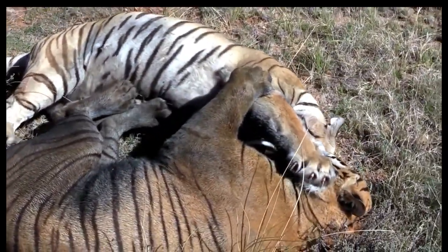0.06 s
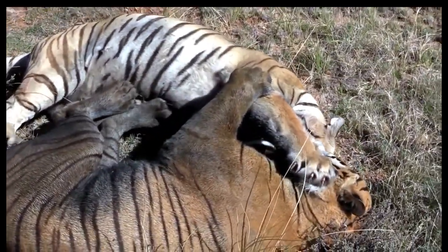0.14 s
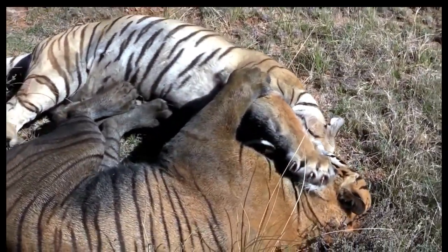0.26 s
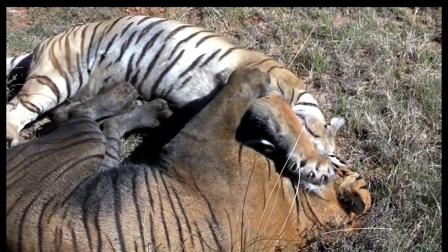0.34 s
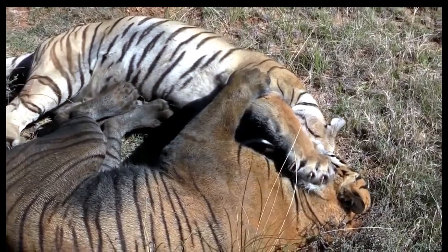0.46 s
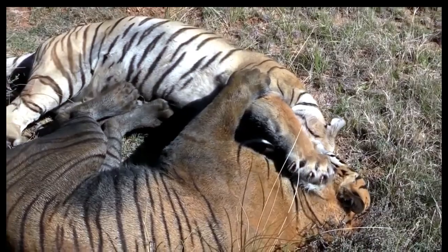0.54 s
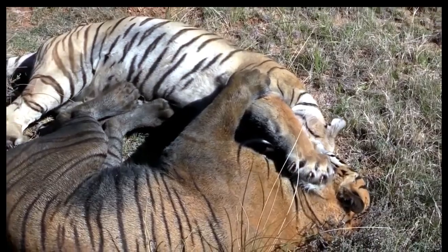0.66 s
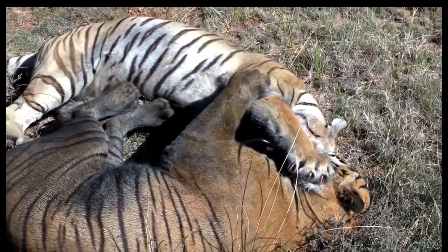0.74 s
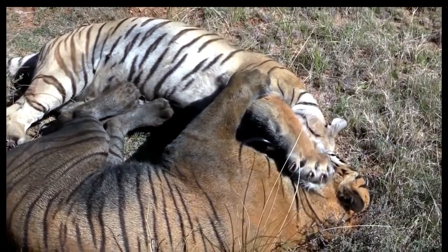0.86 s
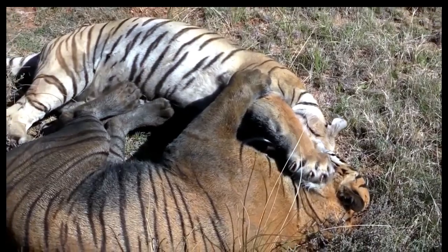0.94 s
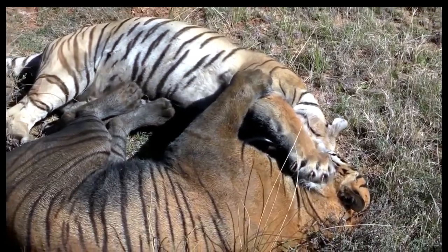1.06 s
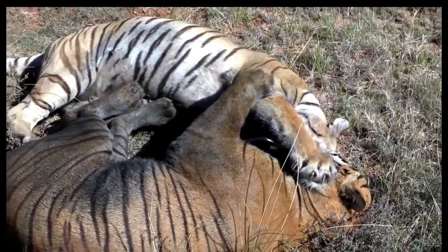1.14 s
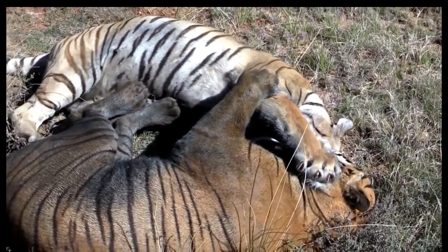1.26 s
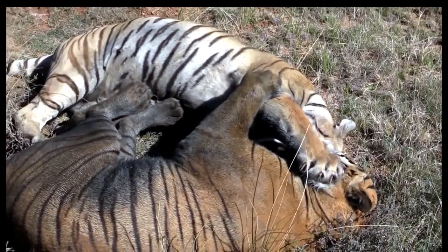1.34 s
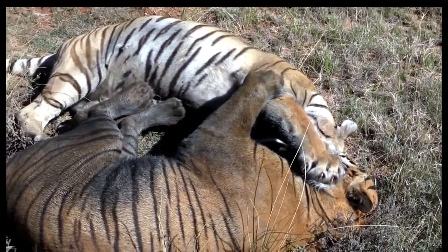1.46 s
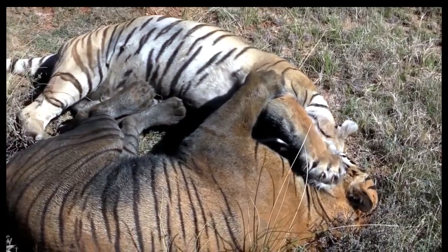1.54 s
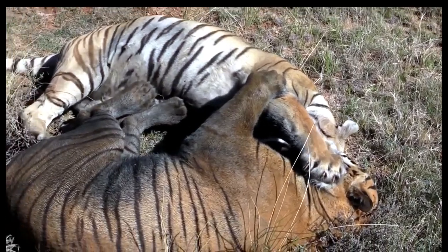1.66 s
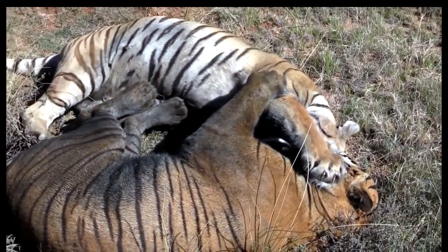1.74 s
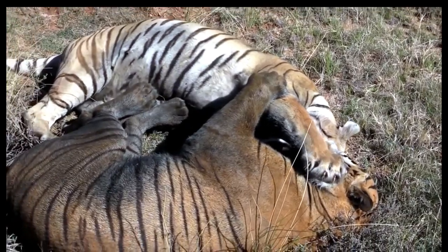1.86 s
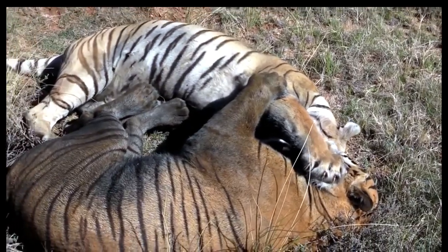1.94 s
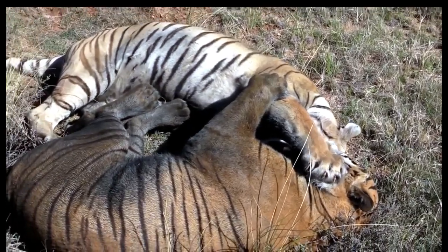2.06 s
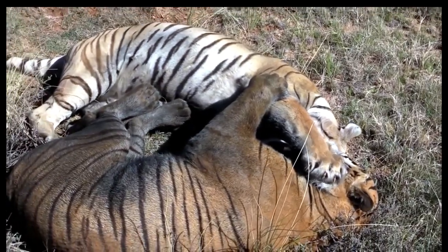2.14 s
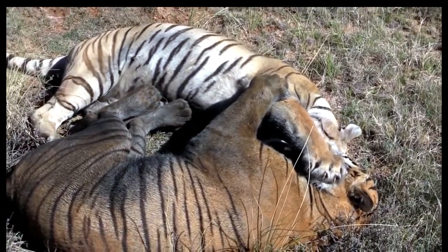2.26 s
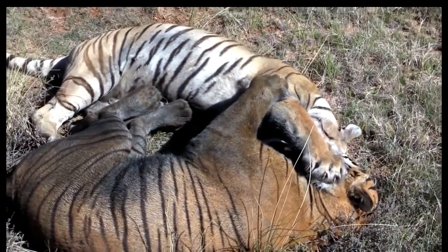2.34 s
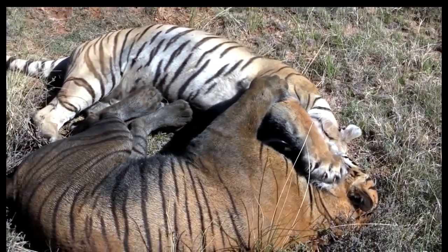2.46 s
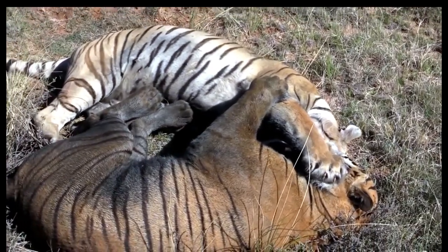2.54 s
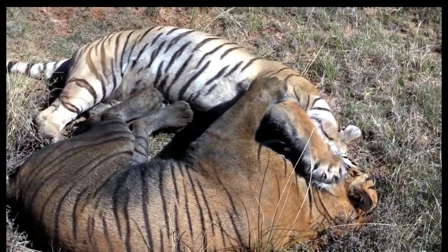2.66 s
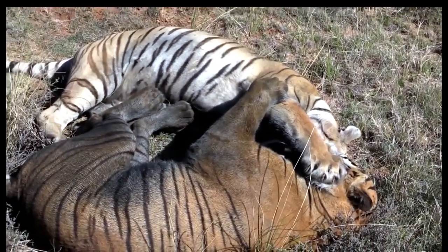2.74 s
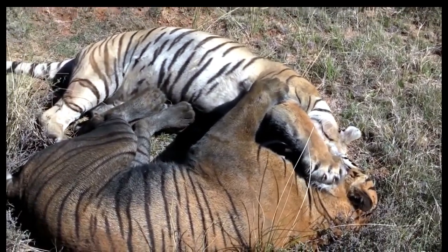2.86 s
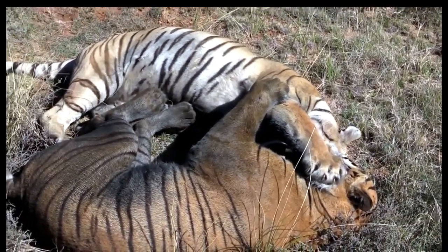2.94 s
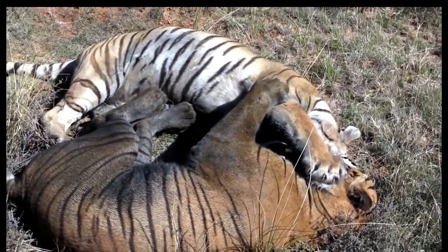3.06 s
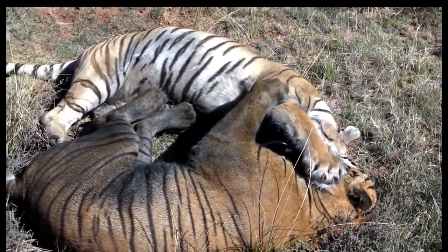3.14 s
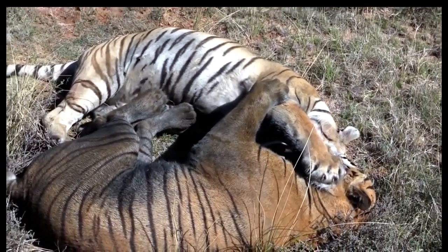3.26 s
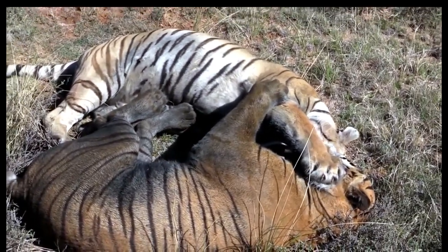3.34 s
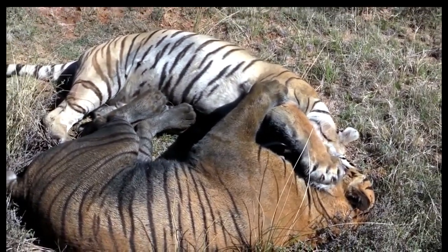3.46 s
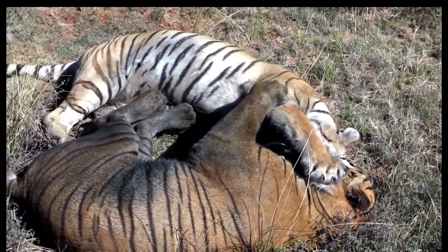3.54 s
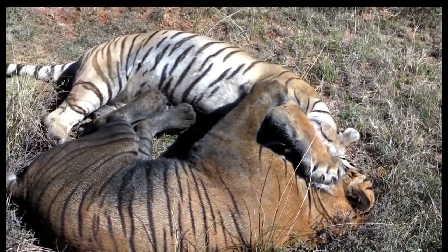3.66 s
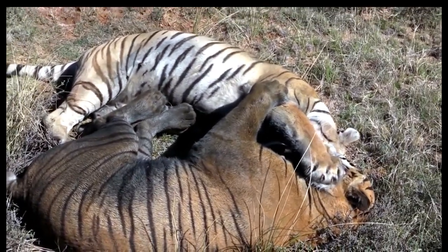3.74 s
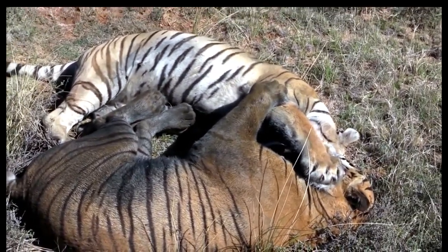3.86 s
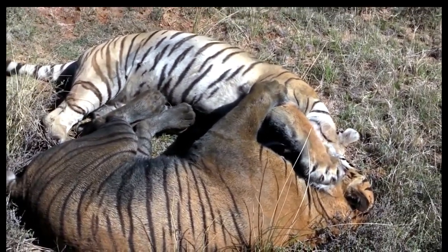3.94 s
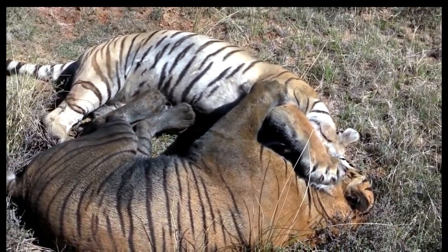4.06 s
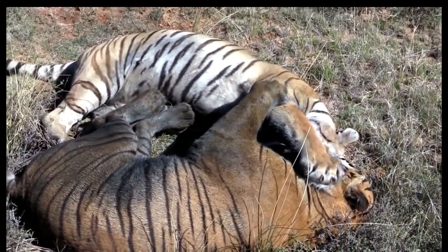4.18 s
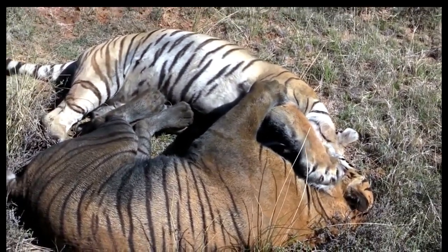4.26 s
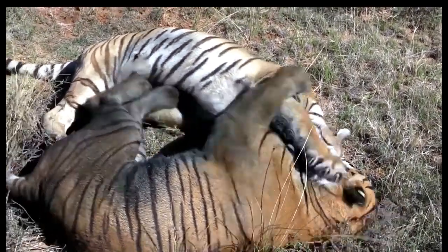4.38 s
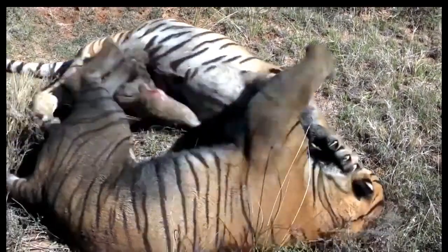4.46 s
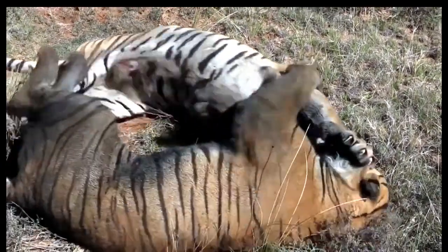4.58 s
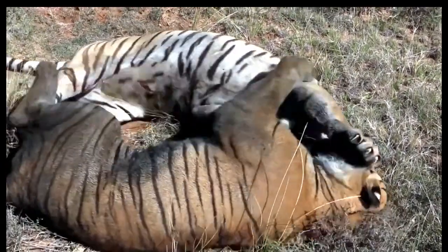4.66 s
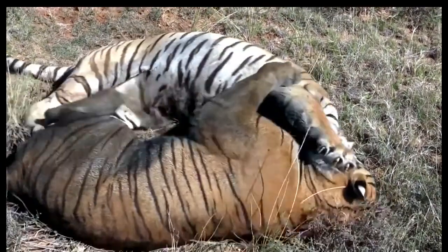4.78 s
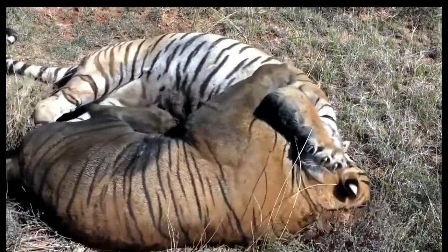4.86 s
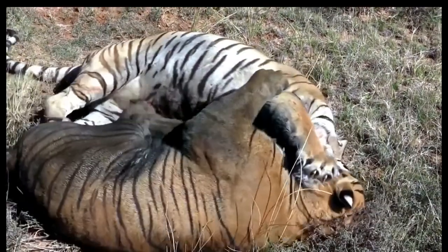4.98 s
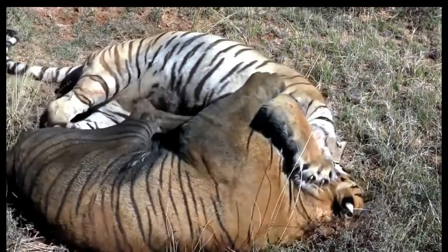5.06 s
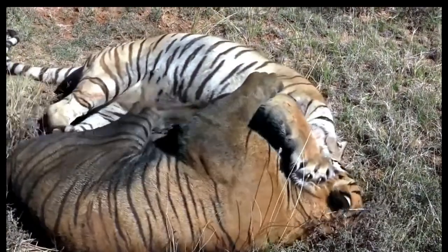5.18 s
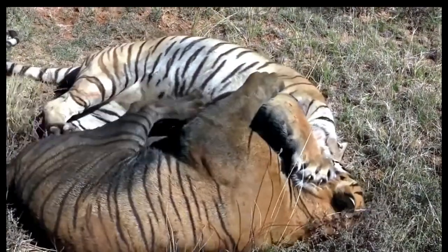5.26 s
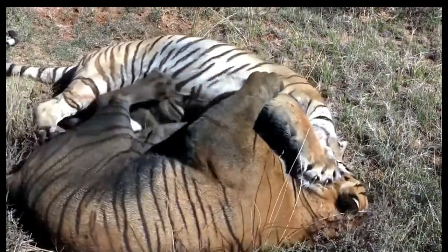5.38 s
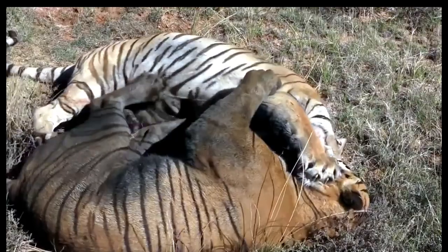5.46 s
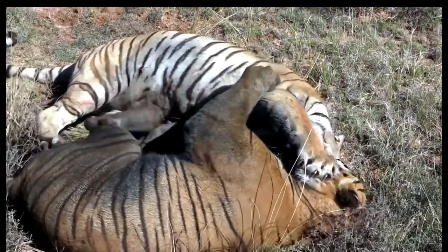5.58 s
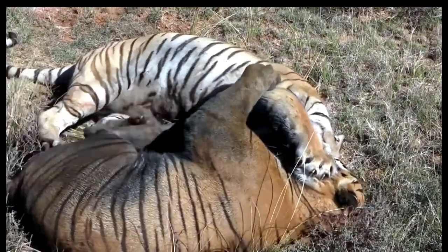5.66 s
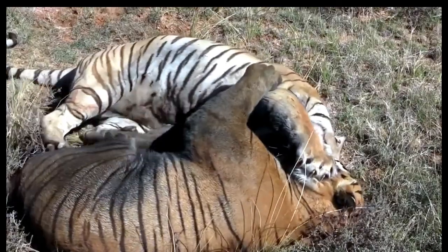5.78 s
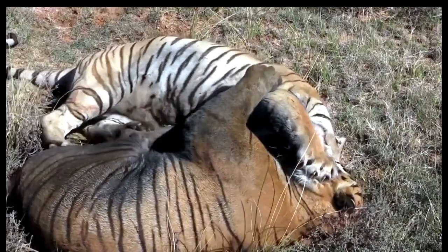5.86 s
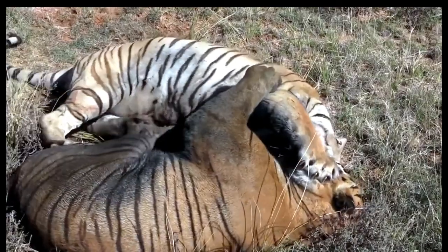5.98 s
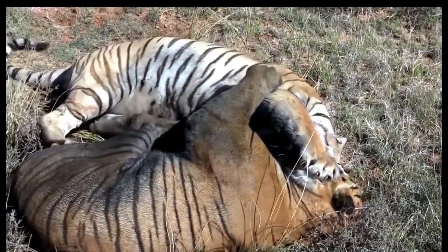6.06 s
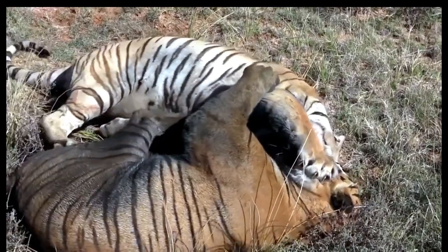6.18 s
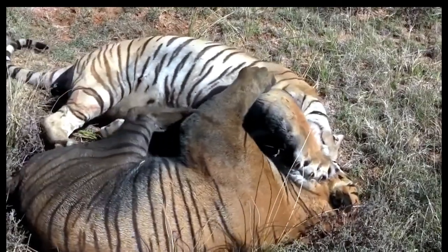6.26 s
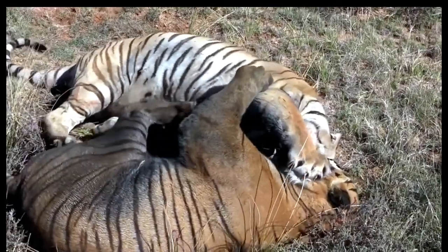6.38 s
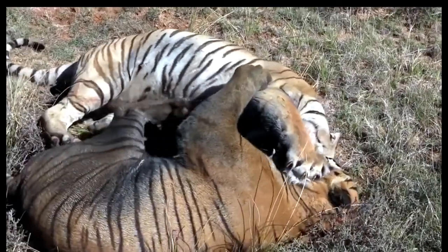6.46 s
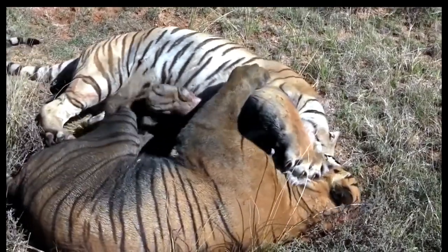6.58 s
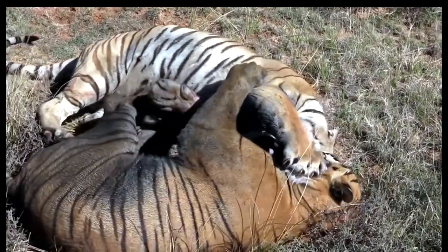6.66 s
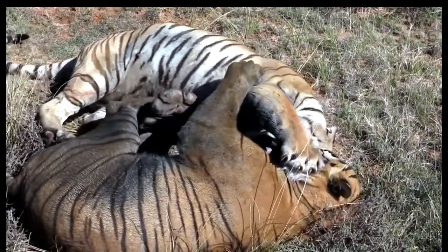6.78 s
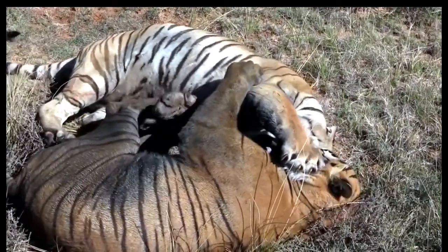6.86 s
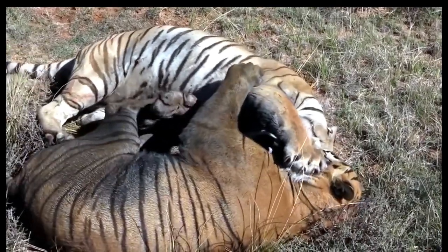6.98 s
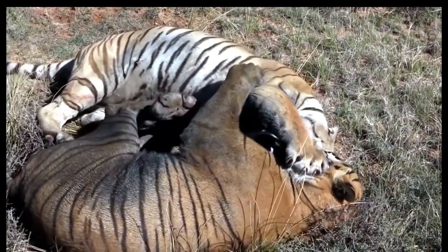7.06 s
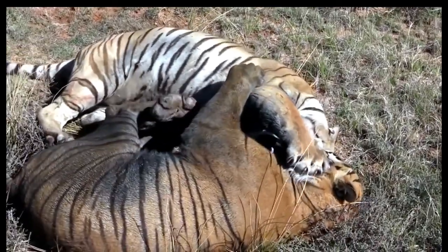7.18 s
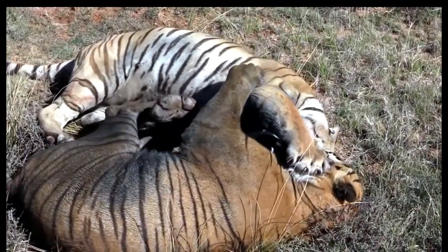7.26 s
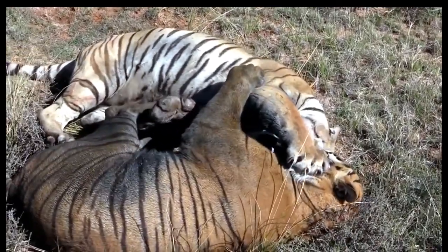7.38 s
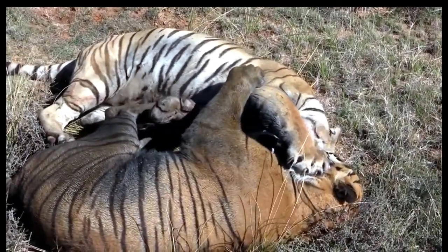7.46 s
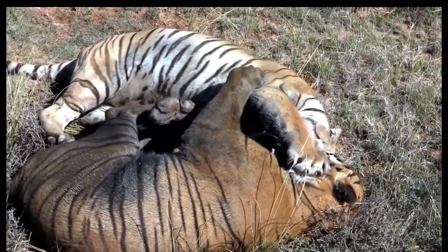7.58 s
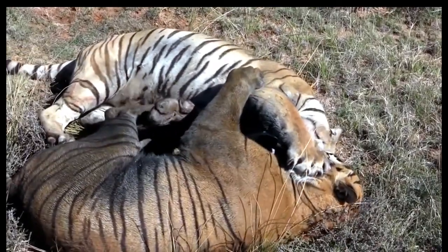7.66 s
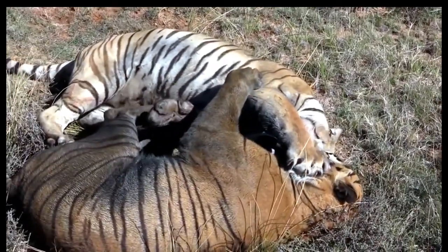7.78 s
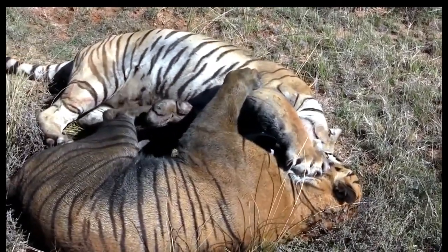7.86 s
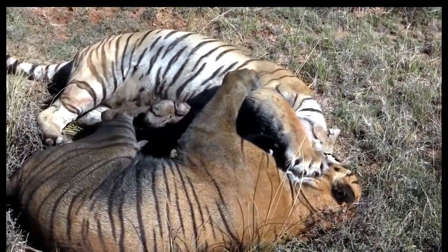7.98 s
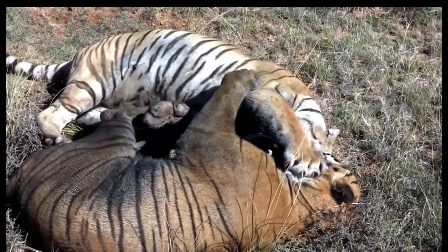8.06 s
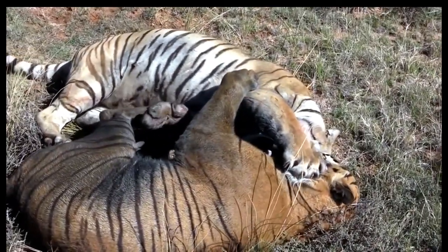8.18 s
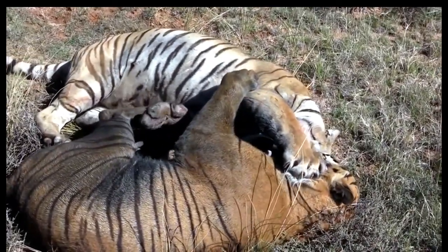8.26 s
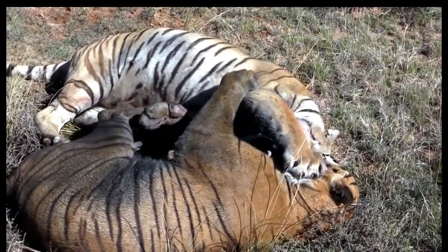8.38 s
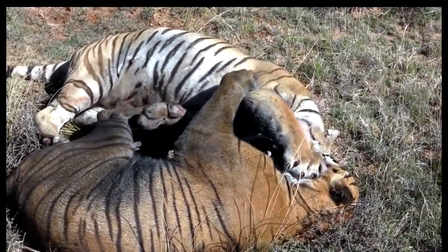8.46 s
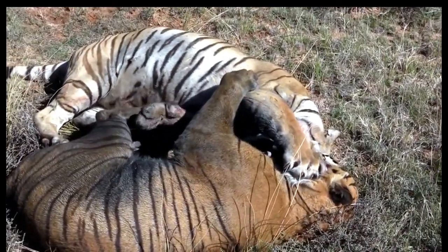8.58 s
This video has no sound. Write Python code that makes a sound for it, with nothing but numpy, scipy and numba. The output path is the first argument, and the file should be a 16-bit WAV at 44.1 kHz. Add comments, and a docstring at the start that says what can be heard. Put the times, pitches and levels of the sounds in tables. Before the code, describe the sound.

A tiger breathes in hoarse fluttering growls, bursts into a loud rasping roar amid a kick and snapping grass, then growls again over a quiet plain.

```python
"""Two tigers in dry grass

Two tigers lie locked together a few metres away. One breathes in hoarse fluttering growls and
breaks into a roar: pulses and turbulent air drive resonances of throat, mouth and chest. The other
rumbles deep in its chest. A kick thrashes the grass in crackling noise, stalks snap as short filtered
bursts, and small birds chirp far off as gliding tones over the hush of the plain, a shaped noise."""
import sys
import numpy as np
from scipy import signal
from scipy.fft import rfft, irfft, next_fast_len
from scipy.io import wavfile
from scipy.ndimage import uniform_filter1d
from numba import njit

SR = 44100
rng = np.random.default_rng(int(sys.argv[2]) if len(sys.argv) > 2 else 0)


def inscribe(sig):
    """Save sig as 16-bit PCM at rate SR to the path in sys.argv[1].

    A 1-D sig is mono; a 2-D sig holds one channel per row.
    Samples are clipped to [-1, 1] before scaling.
    """
    pcm = np.round(np.clip(np.atleast_2d(sig).T, -1, 1) * 32767)
    wavfile.write(sys.argv[1], SR, pcm.astype(np.int16))


N = 380583
T = np.arange(N) / SR

# Spectrum of turbulent air, breathed or roared: (frequency [Hz], relative level [dB])
AIR_SPECTRUM = [(2500, 12), (4000, 1.5), (5500, -5.5), (6500, -3), (8000, -4.5), (10000, -13), (13000, -15),
                (15500, -29.5)]

# Course of the roar: (time [s], mouth level [dB], upper throat level [dB], mouth resonance [Hz],
# pharynx against mouth [dB], hiss against upper throat [dB])
ROAR_COURSE = [(4.6, -46, -56, 412, -11, 0), (4.63, -32.5, -50, 407, 9, 14),
               (4.68, -17, -38.5, 383, -37, 7), (4.735, -8.5, -16.5, 465, -9.5, -10.5),
               (4.79, -17, -36, 495, -16.5, 7), (4.83, -15, -30.5, 415, -19, 1.5),
               (4.87, -12, -29.5, 437, -3, -1.5), (4.96, -17, -25.5, 438, 1, -4),
               (5.06, -17, -26, 457, -0.5, -5), (5.165, -15, -15, 460, 0.5, -13.5),
               (5.22, -25, -37.5, 457, 8.5, 4), (5.28, -19, -24.5, 485, -11, -10.5),
               (5.37, -20, -28.5, 423, 1, 3.5), (5.44, -30, -32.5, 483, 3.5, 2.5),
               (5.49, -17.5, -26.5, 427, -14, -4.5), (5.59, -22.5, -24.5, 426, -0.5, -2),
               (5.675, -25.5, -24.5, 428.2, 0.5, -7), (5.745, -25.5, -24.5, 440, -3, -3),
               (5.97, -42, -35, 448.3, -2, 0), (6.02, -65, -54, 410.6, 1, 3)]
# Resonances of the upper throat, each wandering a little around its centre:
# (centre [Hz], width of the sharper stage [Hz], relative level [dB])
ROAR_RESONANCES = [(722, 600, -10), (958, 127, 15.5), (1147, 70, 11.5), (1345, 750, 5), (1880, 79, -20),
                   (2145, 220, 10.5), (2300, 49, -23.5), (2430, 1100, -18), (3105, 390, -5),
                   (3790, 142, 1.5)]
# Heavy folds closing: (time [s], snaps counted so far)
FOLD_COUNT = [(4.6, -2), (4.634, 0), (4.699, 4), (4.764, 8), (4.843, 13), (4.903, 17), (4.995, 23),
              (5.036, 26), (5.11, 31), (5.155, 34), (5.239, 39), (5.276, 41), (5.326, 44), (5.463, 52),
              (5.588, 59), (5.663, 63), (5.722, 66), (5.787, 69), (5.86, 72), (5.914, 74), (5.976, 76),
              (6.004, 77), (6.04, 78.2)]
# Single hard cracks among the snaps: (time [s], level above the other snaps [dB])
HARD_CRACKS = [(4.764, 4), (4.872, 2.5), (5.036, 4), (5.082, 2.5), (5.11, 3), (5.127, 3), (5.155, 3),
               (5.276, 2), (5.326, 3), (5.722, 5)]
# Chest in the roar, at onset, peak and end: (time [s], level [dB])
ROAR_CHEST_SWELL = [
    [(4.6, -38), (5.16, -30.5), (5.99, -44)],
]
# The jaw shapes the mouth: (time [s], pharynx [Hz], front of the mouth [Hz], front against mouth [dB],
# damping of the mouth [0-1])
JAW_COURSE = [(4.6, 310, 605, -10.5, 0.2), (4.69, 337, 600, -10.5, 0), (4.76, 338, 627, -1.5, 0.5),
              (4.84, 334, 616, -3.5, 0), (4.93, 327, 610, -2, 0.2), (5.03, 294, 600, -5.5, 1),
              (5.18, 292, 640, -3.5, 1), (5.28, 300, 695, 3.5, 1), (5.34, 325, 613, -0.5, 0.9),
              (5.44, 310, 746, -3, 1), (5.52, 330, 644, -4, 0.44), (5.6, 333, 650, -7, 0.27),
              (5.7, 313, 706, -2, .9), (6.04, 303, 760, 5, 1)]
# The tongue shifts a bright resonance: (time [s], centre [Hz], level against the upper throat [dB])
TONGUE_COURSE = [(4.6, 1490, 16), (4.76, 1550, 20), (4.84, 1860, 6), (5.15, 1970, -11.5), (5.22, 1240, -3),
                 (5.33, 1190, -25.5), (5.38, 1900, -15), (5.5, 2210, 2), (5.6, 2250, -2.5),
                 (5.79, 2190, 12.5), (5.82, 2303, -14), (5.84, 3000, -2), (5.87, 3120, 0), (6.04, 2960, -5)]
ROAR_CHEST_SAG = 0.037
# Air against the snaps at a firm upper throat level, before the boosts of low and high drive
AIR_DB, AIR_PER_DB, FIRM_DB = -8, .7, -24
TIGHT_WIDTH_HZ, SLACK_WIDTH_HZ, FRONT_WIDTH_HZ, PHARYNX_WIDTH_HZ = 75, 190, 210, 170.
CLICK_DB = -7  # the snap itself, heard past the ringing
THROAT_DRIFT = .02  # share by which each upper resonance wanders


def roar():
    """Source-filter principle: snapping folds, loose flaps and rasping air ring mouth, throat and chest."""
    gate, mouth_db, upper_db, mouth_hz, pharynx_db, hiss_db = play([ROAR_COURSE])
    _, chest_db = swell(ROAR_CHEST_SWELL, ROAR_CHEST_SAG)
    _, pharynx_hz, front_hz, front_db, damping = play([JAW_COURSE])
    _, tongue_hz, tongue_db = play([TONGUE_COURSE])

    pulses, phase, size = counted(FOLD_COUNT, .025, 1.5, HARD_CRACKS)
    flaps = folds(135. * (gate > 0), .35, 4.0)
    snaps = even(pulses)
    rasp = even(size * (.5 + np.exp(-phase / 0.1)) * air())
    loose = even(rasp - 1.12 * even(flaps))
    # slacker folds leak more air
    leak_db = np.minimum(AIR_DB + AIR_PER_DB * (FIRM_DB - upper_db), 3)
    low = snaps + undb(leak_db + 2.5) * loose
    # turbulence weighs more in the treble
    high = uniform_filter1d(snaps, size=7) + undb(leak_db + 9) * loose

    tight = even(svf(svf(low, mouth_hz, 3 * TIGHT_WIDTH_HZ), mouth_hz, TIGHT_WIDTH_HZ))
    slack = even(svf(svf(low, mouth_hz, 3 * SLACK_WIDTH_HZ), mouth_hz, SLACK_WIDTH_HZ))
    pharynx = even(svf(svf(low, pharynx_hz, PHARYNX_WIDTH_HZ), pharynx_hz, PHARYNX_WIDTH_HZ))
    front = even(svf(svf(low, front_hz, 3 * FRONT_WIDTH_HZ), front_hz, FRONT_WIDTH_HZ))
    click = even(throat(uniform_filter1d(snaps, size=12), [(800, 1800, 0)]))
    damping = damping.clip(0, 1)
    mouth = (1 - damping) * tight + damping * slack + undb(pharynx_db) * pharynx
    mouth = even(mouth - undb(front_db) * front - undb(CLICK_DB) * click)

    upper = undb(tongue_db) * svf(svf(high, tongue_hz, 650.), tongue_hz, 650.)
    for k, (mode_hz, width, db) in enumerate(ROAR_RESONANCES):
        hz = mode_hz * np.exp(THROAT_DRIFT * walk(11))
        upper = upper + (-1) ** k * undb(db) * svf(svf(high, hz, 3. * width), hz, 1. * width)
    upper = even(upper)
    hiss = even(colour(.1 * snaps + rasp, AIR_SPECTRUM))
    chest = even(throat(low, [(109, 39.0, 0.0), (158.0, 48, -1.5)], steep=True))
    throat_sound = undb(upper_db) * (upper + undb(hiss_db) * hiss)
    return gate * (undb(mouth_db) * mouth + throat_sound + undb(chest_db) * chest)


# Growled breaths out, each at onset, peak and end:
# (time [s], throat level [dB], hiss against throat [dB], depth of the flutter [0-1])
BREATHS_OUT = [
    [(0.08, -47, -2, 0), (0.212, -33.5, -2.5, 0.42), (0.75, -50.5, -2, 0.56)],
    [(1.78, -52, 3.5, 0.04), (2.13, -42.5, -6.5, 0.55), (2.45, -53.5, -3, 0.57)],
    [(3.315, -44.5, -10, .2), (3.66, -47, -7, .78), (3.83, -63, -9, .84)],
    [(5.975, -31.5, -14, 0.62), (6.012, -26, -18, 0.5), (6.03, -51, -18, 0.7)],
    [(6.86, -43, -3, 0.24), (7.274, -28, -7.5, 0.51), (7.88, -45.5, -6.5, 0.36)],
]
# Throat breathing out, before and after the kick: (centre [Hz], width per stage [Hz], relative level [dB])
THROATS_OUT = ([(831, 200, 2), (1286, 146, 2.5), (1824, 410, -1.5), (2167, 35, -3.5), (2300, 40, -27),
               (2680, 330, -14), (3270, 260, -8.5), (3815, 103, -11.5)], [(446, 180, -5.5), (827, 183, 7.5),
               (1268, 290, 2.5), (1790, 175, -1), (2160, 340, -3), (2930, 290, -6), (3113, 105, -2.5),
               (3350, 160, -9.5)])
# Slack flap in the throat: (time [s], slaps counted so far)
FLAP_COUNT = [(0, -6), (.18, 0), (.244, 2), (.345, 5), (.41, 7), (.506, 10), (.616, 13), (.726, 16),
              (1.79, 40), (2.054, 48), (2.157, 51), (2.28, 54), (2.364, 56), (2.476, 59), (3.313, 80),
              (3.582, 88), (3.655, 90), (3.799, 93), (5.976, 150), (6.004, 151), (6.967, 180), (7.102, 185),
              (7.306, 192), (7.396, 195), (7.517, 199), (7.619, 202), (7.752, 206), (7.867, 209),
              (8.7, 230)]
OUT_SAG, OUT_HELD = 0.32, 0.63  # see swell()
DEEPEN_START_S, DEEPEN_END_S = .16, .07  # before the peak: the flutter moves to its depth at the peak


def breathe_out():
    """Amplitude modulation: a slack flap chops turbulent air into puffs, and each slap rings the throat."""
    gate, db, hiss_db, _ = swell(BREATHS_OUT, OUT_SAG, OUT_HELD)
    depth_courses = []
    for first, peak, last in BREATHS_OUT:
        depth_courses.append([(first[0], first[-1]), (peak[0] - DEEPEN_START_S, first[-1]),
                              (peak[0] - DEEPEN_END_S, peak[-1]), (last[0], last[-1])])
    _, depth = play(depth_courses)
    slaps, phase, size = counted(FLAP_COUNT, .04, 2.0)
    # a puff swells and fades after each slap; the times are shares of a cycle
    puff = size * (1 - np.exp(-phase / .09)) * np.exp(-phase / .2)
    flow = (1 - depth) ** 1.5 + depth * even(uniform_filter1d(puff, size=150))
    drive = even(flow * air() + .11 * depth * unit(np.roll(slaps, 150)))
    hiss = unit(colour(even(flow * air()), AIR_SPECTRUM))
    return gate * undb(db) * (turned(drive, THROATS_OUT) + undb(hiss_db) * hiss)


# Breaths drawn in, each at onset, start of the fade and end:
# (time [s], throat level [dB], hiss against throat [dB])
BREATHS_IN = [
    [(0.842, -54, -9), (0.95, -56, 4.5), (1.6, -90.5, 18)],
    [(2.46, -47, -8.5), (2.81, -51, -7.5), (3.09, -69.5, -5)],
    [(3.93, -56, -15), (4.03, -56, -2), (4.33, -61, -4)],
    [(6.075, -40.5, -8), (6.43, -48, 2.5), (6.82, -57, -21)],
    [(7.91, -47, -4.5), (8.15, -51, 3), (8.63, -71.5, -18)],
]
# Throat breathing in, before and after the kick: (centre [Hz], width per stage [Hz], relative level [dB])
THROATS_IN = ([(434, 144, 5.5), (838, 270, 8), (1233, 50, 9), (1420, 660, 3.5), (1890, 370, 2),
              (2380, 390, 0), (3000, 180, -21), (3280, 300, 1.5)], [(423, 520, 2.5), (893, 316, 6.5),
              (1175, 60, 6), (1370, 350, 3.5), (1846, 160, 4), (2270, 490, -12), (3060, 210, -5.5),
              (3500, 350, -14)])
IN_SAG = 0.15


def breathe_in():
    """Turbulence noise: smooth air excites the resonances of a differently shaped throat."""
    gate, db, hiss_db = swell(BREATHS_IN, IN_SAG)
    flicker_db = 1.5 * walk(25)
    hiss = undb(hiss_db) * unit(colour(air(), AIR_SPECTRUM))
    return gate * undb(db + flicker_db) * (turned(air(), THROATS_IN) + hiss)


KICK_S = 4.4
BREATH_DRIFT, BREATH_WAVER_DB = .013, 2.5  # each resonance wanders and swells alone


def turned(x, throats):
    """Time-varying resonance: the kick turns the head and alters the throat, whose modes never sit still."""
    kick = int(KICK_S * SR)
    parts = []
    for part, modes in zip((slice(0, kick), slice(kick, N)), throats):
        out = 0
        for k, (mode_hz, width, mode_db) in enumerate(modes):
            hz = (mode_hz * np.exp(BREATH_DRIFT * walk(9)))[part]
            db = (mode_db + BREATH_WAVER_DB * walk(28))[part]
            out = out + (-1) ** k * undb(db) * svf(svf(x[part], hz, 1. * width), hz, 1. * width)
        parts.append(unit(out))
    return np.concatenate(parts)


# Chest rumbles and grunts, each at onset, peak and end: (time [s], level [dB], upper part [dB])
RUMBLE_SWELLS = [
    [(-0.03, -35, -4), (0.19, -36, -3), (0.55, -43.5, -3.5)],
    [(0.58, -50, -14), (0.72, -41, -6.5), (1.04, -47.5, -3.5)],
    [(1.075, -46.5, -12), (1.19, -43, -5), (1.74, -46.5, -11.5)],
    [(1.8, -61, 1), (2.03, -43, -5), (2.56, -58.5, -8)],
    [(3.31, -62, 2), (3.375, -52.5, 1.5), (3.77, -71, 1)],
    [(4.27, -56, -6), (4.44, -31.5, -4.5), (4.6, -50, 3.5)],
    [(6.07, -57, 1), (6.135, -59.5, 12), (6.3, -60, -5)],
    [(6.335, -49, -2.5), (6.495, -35.5, -4), (6.52, -53, -7)],
    [(6.86, -49.5, -5.5), (7.24, -43, -8), (8.05, -58, -5)],
]
# Deep, middle and upper chest resonance: (centre [Hz], width per stage [Hz], relative level [dB])
CHEST_RESONANCES = [(107, 167, 0.5), (164, 102, 6), (284, 240, 0)]
RUMBLE_SAG, RUMBLE_WAVER_DB = 0.34, 2.2
CHEST_DRIFT = .09  # share by which the chest resonances wander together


def rumble():
    """Low-pass radiation: a closed-mouth growl of very uneven pulses is heard only through the chest."""
    gate, db, upper_db = swell(RUMBLE_SWELLS, RUMBLE_SAG)
    db = db + RUMBLE_WAVER_DB * walk(14)
    pulses = folds(np.full(N, 62.), .4, 3.0)
    lowpass = signal.butter(4, 420., fs=SR, output="sos")
    drive = signal.sosfilt(lowpass, unit(pulses) + 0.6 * air())
    drift = np.exp(CHEST_DRIFT * walk(9))
    rings = []
    for hz, width, mode_db in CHEST_RESONANCES:
        rings.append(undb(mode_db) * svf(svf(drive, hz * drift, 1. * width), hz * drift, 1. * width))
    deep, middle, upper = rings
    low, upper = even(deep - middle), even(upper)
    # the low part takes the power left by the upper part
    low_share = np.sqrt((1 - undb(2 * upper_db)).clip(.05, 1))
    return gate * undb(db) * (low_share * low + undb(upper_db) * upper)


# Knocks from the chest around the kick and the last thrash: (time [s], peak level [dB], pitch [Hz])
CHEST_KNOCKS = [(4.288, -44, 202), (4.382, -28.5, 336), (4.417, -16.5, 309), (4.44, -18.5, 284),
                (4.459, -22, 255), (4.532, -28, 300), (4.595, -32, 291), (6.479, -25, 206),
                (6.486, -24, 213)]
KNOCK_RING_S = 0.01


def knocks():
    """Impulse response: each knock rings the chest as a decaying sine of a few cycles."""
    out, t = np.zeros(N), np.arange(2500) / SR
    for s, peak_db, hz in CHEST_KNOCKS:
        start = int(s * SR)
        ring = np.exp(-t / KNOCK_RING_S) * np.sin(2 * np.pi * hz * t)
        out[start:start + len(t)] += undb(peak_db) * ring
    return out


# Grass thrashed, each time at onset, peak and end:
# (time [s], level of the middle hiss [dB], treble against that hiss [dB])
THRASHES = [
    [(3.47, -63, -10), (3.512, -60.5, 14.5), (3.56, -64, -20)],
    [(4.28, -66, -29), (4.468, -50.5, -14), (4.61, -60.5, -8)],
    [(6.1, -78, 14), (6.146, -67, 16), (6.16, -68, 4)],
    [(6.41, -82, -12), (6.458, -58, 4), (6.52, -71, -4)],
]
# Stalks snap: (time [s], peak level [dB], centre [Hz])
STALK_SNAPS = [(3.1497, -44, 2090), (3.8651, -37, 2300), (4.4044, -17, 3600), (4.4657, -23, 2280),
               (4.5146, -26, 1770), (6.3799, -31, 1500), (6.4293, -32, 2670), (6.4602, -30, 2230),
               (6.5294, -40, 3040)]
THRASH_SAG = 0.29


def grass():
    """Granular noise: limbs crackle dense dry stalks, and each single snap is a decaying filtered burst."""
    gate, db, treble_db = swell(THRASHES, THRASH_SAG)
    # every 40 samples the crackle takes a new random level
    grain_db = 2.2 * np.repeat(rng.exponential(1, N // 40 + 1).clip(0, 4), 40)[:N]
    crackle = air() * undb(grain_db)
    rustle = unit(colour(crackle, [(400, 0.0), (1500, 1.5), (3500, -5.5), (4500, -30.0)]))
    hiss = unit(colour(crackle, [(3500, -37.0), (4200, 7.0), (9000, -10.0), (9800, -47.5)]))
    treble = unit(colour(crackle, [(8500, -24.5), (9300, -1), (15000, -10)]))
    out = gate * undb(db) * (undb(15.0) * rustle + hiss + undb(treble_db) * treble)
    tail = np.exp(-np.arange(600) / (0.0032 * SR))
    for s, peak_db, hz in STALK_SNAPS:
        start = int(s * SR)
        snap = svf(rng.standard_normal(600) * tail, np.full(600, 1. * hz), 1.03 * hz)
        out[start:start + 600] += undb(peak_db) * snap / np.abs(snap).max()
    return out


# Narrow bands of airy hiss, each at onset, peak and end: (time [s], level [dB], centre [Hz])
AIRY_BANDS = [
    [(.86, -66, 3350), (.95, -61, 3330), (1.05, -64, 3300)],
    [(1.1, -57, 2380), (1.2, -55, 2500), (1.58, -70, 2530)],
    [(2.68, -60, 3330), (2.78, -58, 3270), (3.05, -69, 3270)],
    [(3.47, -56, 3420), (3.51, -42, 3350), (3.57, -60, 3350)],
    [(4.27, -56, 1460), (4.347, -37, 1530), (4.36, -56, 1600)],
]
AIRY_SAG, AIRY_WIDTH_HZ = 0.24, 330  # width of each of two stages


def airy():
    """Band-pass filtering: two narrow stages leave a faint band of noise whose centre drifts a little."""
    gate, db, hz = swell(AIRY_BANDS, AIRY_SAG)
    return gate * undb(db) * unit(svf(svf(air(), hz, AIRY_WIDTH_HZ), hz, AIRY_WIDTH_HZ))


# Far birds: (time [s], length [s], first pitch [Hz], middle pitch [Hz], last pitch [Hz], level [dB])
BIRD_CHIRPS = [(0.277, 0.1, 4300, 4980, 5100, -54), (0.576, 0.035, 3300, 3950, 5200, -52),
               (1.095, 0.06, 3250, 3850, 3200, -58), (1.17, .06, 3100, 3600, 3400, -64),
               (1.349, .016, 2900, 2550, 2250, -47), (1.274, 0.036, 2910, 2850, 2760, -61),
               (1.6, 0.29, 2650, 2720, 2750, -65), (2.94, 0.1, 2400, 2320, 2330, -56),
               (2.93, .04, 4550, 4750, 4600, -62), (3.74, 0.026, 4300, 4660, 5000, -59),
               (3.83, 0.017, 2900, 2670, 2400, -52), (4.147, 0.037, 4500, 4860, 4850, -58),
               (8.378, 0.064, 2330, 2520, 2080, -58), (8.432, 0.072, 2080, 2430, 2150, -58),
               (8.538, 0.025, 2000, 2150, 2220, -60), (8.608, .02, 2450, 2400, 2330, -58)]


def birds():
    """Frequency modulation: short pure whistles glide along a parabola through three pitches."""
    out = np.zeros(N)
    for s, length, first_hz, middle_hz, last_hz, db in BIRD_CHIRPS:
        u = np.linspace(-1, 1, int(length * SR))
        bend_hz = (first_hz + last_hz) / 2 - middle_hz
        hz = middle_hz + (last_hz - first_hz) * u / 2 + bend_hz * u ** 2
        whistle = (1 - u ** 2) ** (1 / 4) * np.sin(2 * np.pi * np.cumsum(hz) / SR)
        start = int(s * SR)
        out[start:start + len(u)] += undb(db) * whistle
    return out * undb(2 * walk(150))  # moving air makes far sounds flicker


# Spectrum of the open plain: (frequency [Hz], relative level [dB per Hz])
PLAIN_SPECTRUM = [(15, -62), (25, -2), (156, 2), (313, -2), (389, -7), (469, -0.5), (567, -8.5),
                  (2120, -3.5), (4040, -9), (4870, -10), (15500, -27)]
PLAIN_DB = -57.5


def plain():
    """Stationary noise: random air motion with a sloping spectrum wavers slightly in level."""
    return undb(PLAIN_DB + 1.0 * walk(7.7)) * unit(colour(air(), PLAIN_SPECTRUM))


def undb(db):
    """Decibel law: amplitude ratio of a level in dB."""
    return 10 ** (np.asarray(db) / 20)


def unit(x):
    """Normalization: scale to an RMS of one."""
    return x / np.sqrt(np.mean(x ** 2))


def even(x):
    """Automatic gain: hold the running RMS at one."""
    return x / np.sqrt(uniform_filter1d(x ** 2, size=6000) + 1e-12)


def air():
    """White noise: the raw material of turbulence."""
    return rng.standard_normal(N) + 1e-18


def walk(rate):
    """Random modulation: levels held 1 / rate s and slewed twice, with an RMS of one."""
    k = int(SR / rate)
    steps = np.repeat(rng.standard_normal(N // k + 1), k)
    return unit(uniform_filter1d(uniform_filter1d(steps, k), k)[:N])


def colour(x, points, share=1):
    """Spectral shaping: weight the Fourier transform by points of (frequency [Hz], level [dB])."""
    hz, db = np.transpose(points)
    size = next_fast_len(N)
    f = np.maximum(np.arange(size // 2 + 1) * SR / size, 1)
    gain = undb(share * np.interp(np.log(f), np.log(hz), db))
    return irfft(rfft(x, size) * gain, size)[..., :N]


def play(tables):
    """Linear interpolation: columns along time, after a gate that is shut between tables."""
    s, *columns = np.transpose(np.concatenate(tables))
    s = np.maximum.accumulate(s)
    gate = sum((T >= t[0][0]) & (T <= t[-1][0]) for t in tables).clip(0, 1)
    return [uniform_filter1d(1. * gate, size=600)] + [np.interp(T, s, c) for c in columns]


ATTACK_S, RELEASE_S, EDGE_DB = 0.041, 0.033, 8.5  # every swell sets in and dies over this many dB


def swell(events, sag, held=2 / 3):
    """Envelope: the level sets in, rises, peaks, falls and dies.

    held is the share of the rise gained in about two thirds of its time, sag the share of the
    fall lost in its first quarter."""
    shapes = []
    for first, peak, last in np.array(events, float):
        knee = peak + (last - peak) / 4
        knee[1] = peak[1] + sag * (last[1] - peak[1])
        build = first + (peak - first) * 2 / 3
        build[0] += ATTACK_S / 3
        build[1] = first[1] + held * (peak[1] - first[1])
        shape = np.array([first, first, build, peak, knee, last, last])
        shape[[1, -1], 0] += ATTACK_S, RELEASE_S
        shape[[0, -1], 1] -= EDGE_DB
        shapes.append(shape)
    return play(shapes)


@njit
def svf(x, hz, width):
    """State-variable filter: a band-pass with a moving centre and gain 1 there."""
    y, b, l = np.empty(len(x)), 0., 0.
    for i in range(len(x)):
        g, k = np.tan(np.pi * hz[i] / SR), width / hz[i]
        v = (b + g * (x[i] - l)) / (1 + g * (g + k))
        b, l, y[i] = 2 * v - b, l + 2 * g * v, k * v
    return y


def throat(x, modes, steep=False):
    """Modal superposition: parallel resonances of alternate sign; steep ones ring twice."""
    out = 0
    for k, (hz, width, db) in enumerate(modes):
        sos = np.concatenate(signal.iirpeak(hz, hz / width, fs=SR))
        out = out + (-1) ** k * undb(db) * signal.sosfilt([sos, sos] if steep else [sos], x)
    return out


@njit
def beat(hz, stretch, size):
    """Relaxation oscillation: a pulse at each phase wrap, each cycle with its own rate and size."""
    pulses, p, k = np.zeros(len(hz)), 0., 0
    for i in range(len(hz)):
        p = p + hz[i] * stretch[k] / SR if hz[i] > 0 else 0.  # at rest the phase starts anew
        if p >= 1:
            p, k = p - 1, k + 1
            pulses[i] = size[k]
    return pulses


def folds(hz, jitter, scatter_db):
    """Jitter and shimmer: throat tissue flaps with uneven timing and strength."""
    chance = rng.standard_normal((2000, 2)).clip(-2, 2).T
    return beat(hz, np.exp(jitter * chance[0]), undb(scatter_db * chance[1]))


def counted(table, jitter, scatter_db, accents=()):
    """Phase accumulation: a running count gives closure pulses, the phase and the size of each cycle."""
    s, done = np.transpose(table)
    cycles = np.maximum.accumulate(np.interp(T, s, done) + jitter * walk(40))
    count = (np.floor(cycles) - done[0]).astype(int).clip(0)
    db = scatter_db * rng.standard_normal(400).clip(-2, 2)
    for at, accent_db in accents:
        db[int(round(np.interp(at, s, done) - done[0]))] = accent_db
    size = undb(db)[count]
    closes = np.diff(count, prepend=count[0]) == 1
    return size * closes, cycles % 1, size


def scatter(x, decay_s):
    """Diffuse reflection: dense short echoes off the ground and nearby surfaces."""
    echoes = rng.standard_normal(6000) * np.exp(-np.arange(6000) / (decay_s * SR))
    return signal.fftconvolve(x, echoes / np.sqrt(np.sum(echoes ** 2)))[:N]


# Colour of the sideways echoes: (frequency [Hz], side echo level [dB])
SIDE_ECHOES = [(240, -48), (330, -18), (640, -14), (1400, -7), (3000, -4), (5000, -5), (8000, -9.5),
               (14000, -5)]


def scene():
    """Superposition: all sources add in front; echoes thicken them and reach left and right unequally."""
    hush = plain()
    highpass = signal.butter(4, 78., "high", fs=SR, output="sos")
    cats = signal.sosfilt(highpass, breathe_out() + breathe_in() + roar() + rumble() + knocks())
    front = cats + grass() + birds() + airy()
    side = colour(scatter(front + hush, .03), SIDE_ECHOES)
    mid = undb(-.6) * (front + undb(-9) * scatter(front, .016)) + hush
    return np.array([mid + side, mid - side])


# Colour difference of the two ports: (frequency [Hz], left minus right [dB])
PORT_DIFFERENCE = [(260, 0), (380, -1.5), (700, 1), (1300, 1.2), (2400, 4), (4400, 0)]
TOP_HZ = 15200


def record(dry):
    """Band limiting and saturation: two unlike ports, thinned bass, rounded peaks and a cut top."""
    left = colour(dry[0], PORT_DIFFERENCE, share=1 / 2)
    right = colour(dry[1], PORT_DIFFERENCE, share=-1 / 2)
    highpass = signal.butter(1, 40., "high", fs=SR, output="sos")
    wet = np.tanh(signal.sosfilt(highpass, np.array([left, right])))
    return .97 * signal.sosfilt(signal.ellip(8, .2, 70, TOP_HZ, fs=SR, output="sos"), wet)


dry = scene()
out = record(dry)
inscribe(out)
```